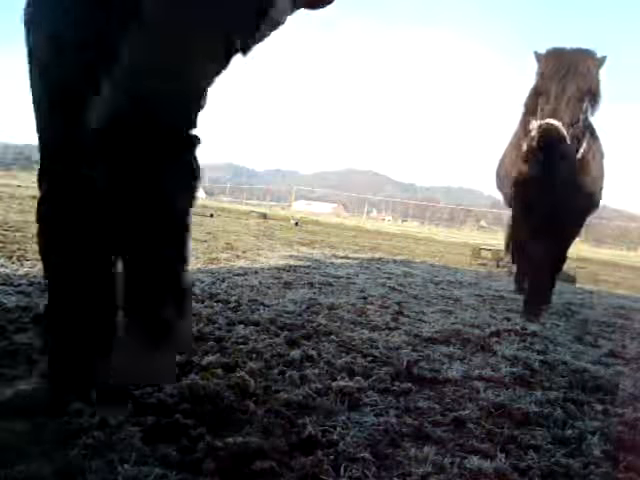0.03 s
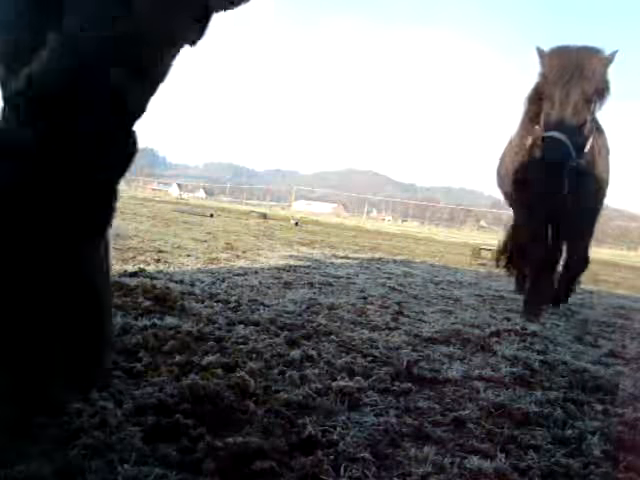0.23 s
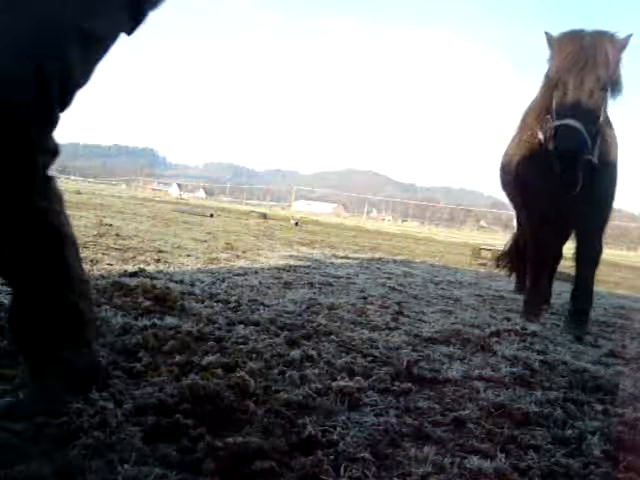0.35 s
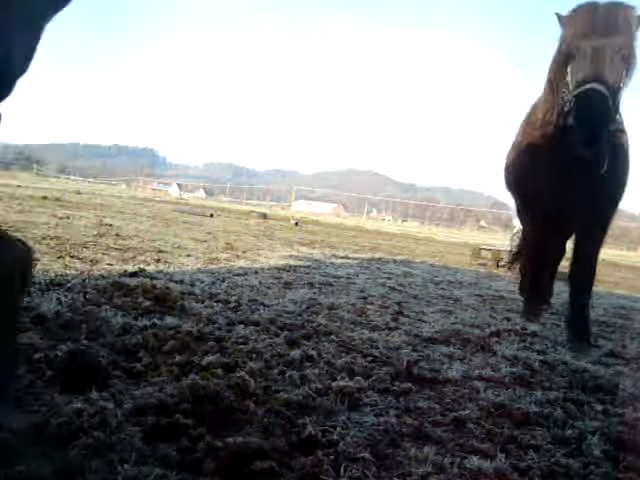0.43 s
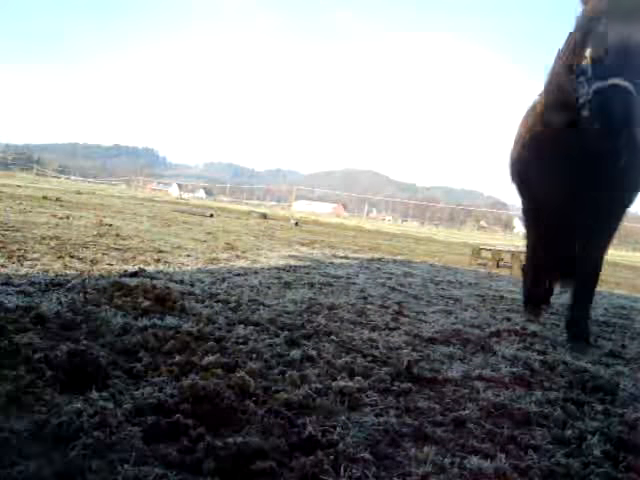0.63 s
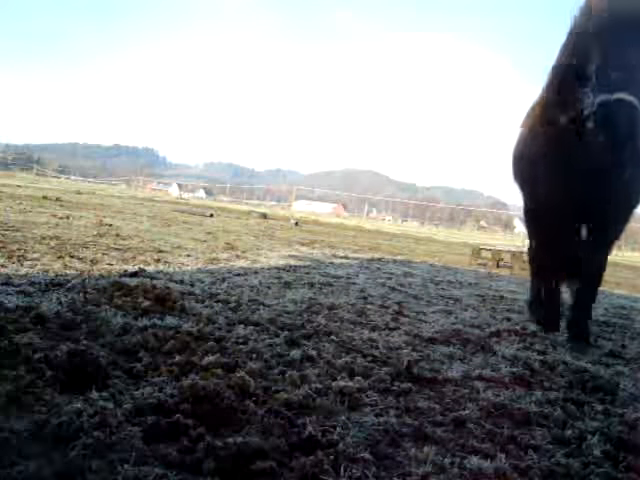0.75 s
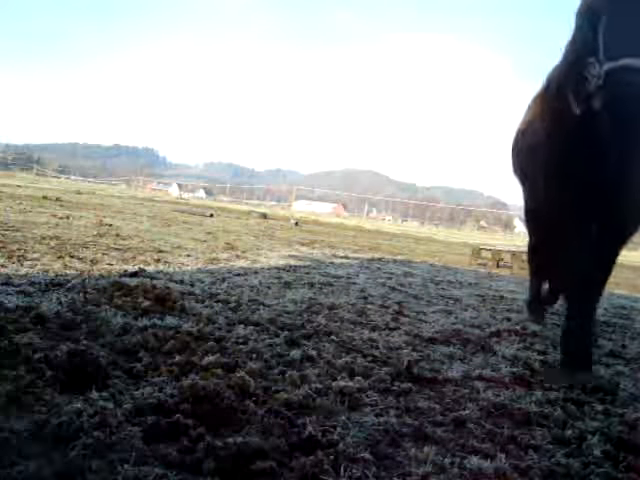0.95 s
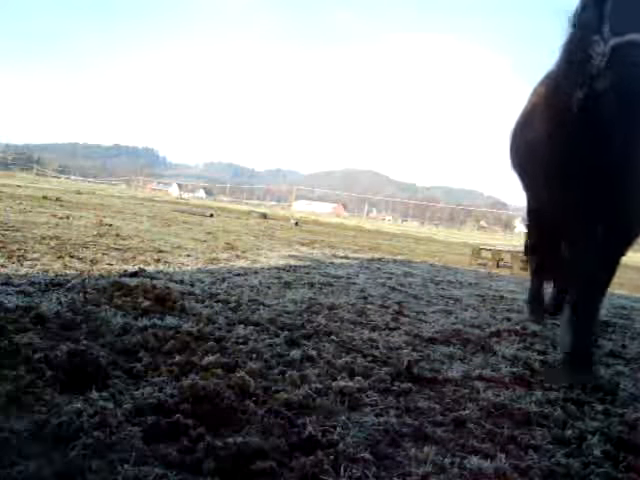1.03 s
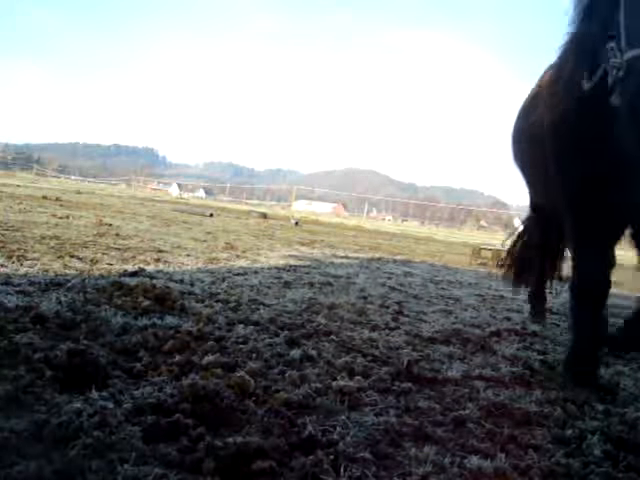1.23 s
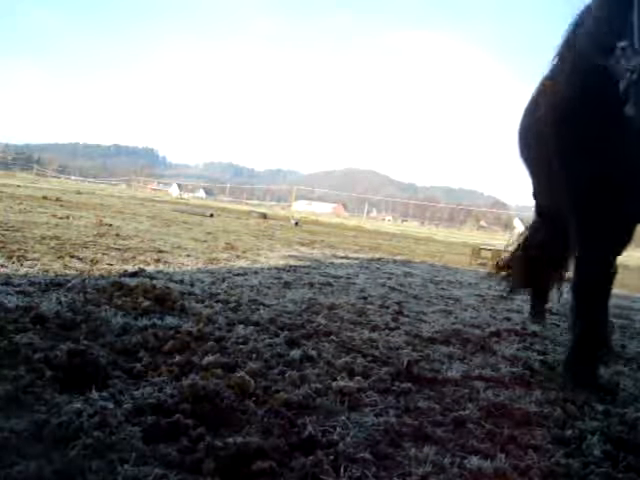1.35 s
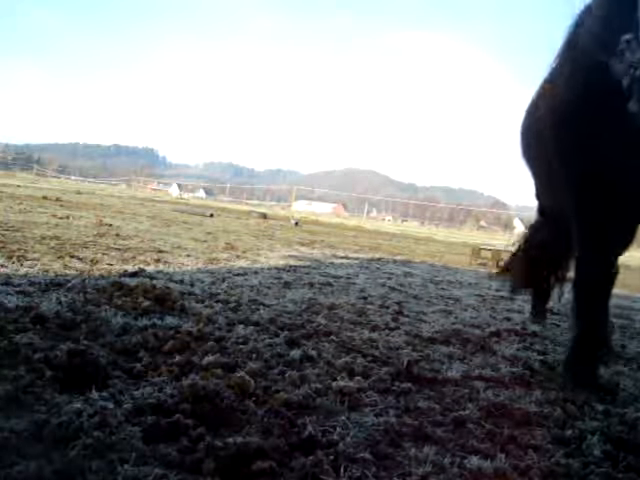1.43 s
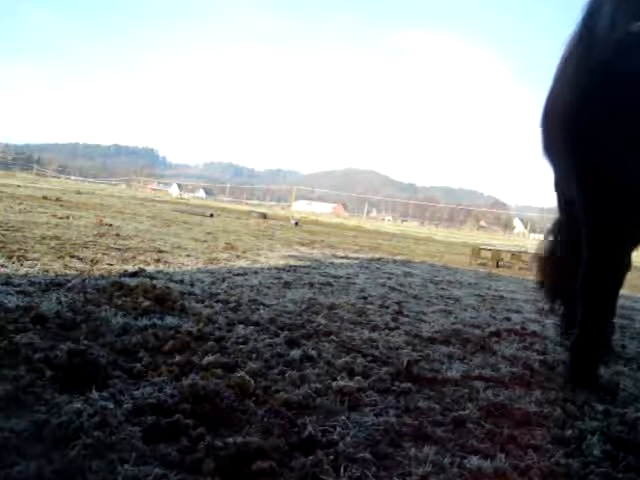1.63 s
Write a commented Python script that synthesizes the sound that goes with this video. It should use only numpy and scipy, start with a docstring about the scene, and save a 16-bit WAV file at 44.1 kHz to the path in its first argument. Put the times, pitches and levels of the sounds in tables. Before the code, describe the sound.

Crunching steps on frozen ground as a person and a pony walk through frosted grass.

```python
"""Footsteps on a frosty pasture

A person steps past a low microphone, with a pony walking up behind. Each footfall breaks the frozen
crust in a few dull knocks and crushes it into crumbs, and stiff stalks snap. Between footfalls, legs
and feet swish through the rimed grass. The air is open, without echo, and carries a faint steady rush."""
import sys
import numpy as np
from scipy import signal
from scipy.fft import rfft, irfft, next_fast_len
from scipy.io import wavfile
from scipy.ndimage import uniform_filter1d

SR = 44100
rng = np.random.default_rng(int(sys.argv[2]) if len(sys.argv) > 2 else 0)


def materialize(psi):
    """Save the field psi as 16-bit PCM at rate SR to the path in sys.argv[1].

    A 1-D psi becomes a single channel; in a 2-D psi each row is a channel.
    """
    bounded = np.clip(np.atleast_2d(psi).T, -1, 1)
    quanta = np.round(bounded * 32767).astype(np.int16)
    wavfile.write(sys.argv[1], SR, quanta)


N = 74970


def undb(db):
    """Amplitude grows tenfold with every 20 dB."""
    return 10 ** (np.asarray(db) / 20)


def unit(x):
    """Normalisation to an rms of 1."""
    return x / np.sqrt(np.mean(x ** 2) + 1e-18)


def since(start):
    """Seconds elapsed since a moment, for every sample."""
    return np.arange(N) / SR - start


def ring(start, t60):
    """Exponential decay: silence until the start, then a fall of 60 dB every t60 seconds."""
    t = since(start)
    return (t >= 0) * np.exp(-np.log(1000) * np.maximum(t, 0) / t60)


def colour(x, points, tilt_db=0):
    """Minimum-phase filtering through (Hz, dB) points, tilted in dB per octave about 1 kHz; rms 1."""
    size = 2 * next_fast_len(N // 2 + 2048)
    bin_hz = np.arange(size // 2 + 1) * SR / size
    octave = np.log2(np.maximum(bin_hz, 20) / 1000)
    hz, db = np.array(points).T
    gain_db = np.interp(octave, np.log2(hz / 1000), db) + tilt_db * octave
    cepstrum = irfft(np.log(undb(gain_db)))
    cepstrum[1:size // 2] *= 2  # folding the cepstrum makes the filter causal
    cepstrum[size // 2 + 1:] = 0
    return unit(irfft(rfft(x, size) * np.exp(rfft(cepstrum)))[:N])


def resonance(x, hz, width_hz):
    """A second-order resonator passes a band, with gain 1 at its centre."""
    return signal.lfilter(*signal.iirpeak(hz, hz / width_hz, fs=SR), x)


def fractures(per_s, spread_db):
    """A Poisson process of tiny impulses: many small ones, a few large."""
    size = undb(spread_db * np.minimum(rng.exponential(size=N), np.pi))
    return (rng.random(N) < per_s / SR) * size * rng.choice([-1, 1], N)


def flicker(per_s):
    """Random modulation: values drawn per_s times a second and smoothed twice; rms 1."""
    span = int(SR / per_s)
    held = rng.standard_normal(N)[np.arange(N) // span]
    return unit(uniform_filter1d(uniform_filter1d(held, span), span))


# Spectrum of the open field's rush. Each row: frequency in Hz, spectral density in dB.
AIR_SPECTRUM = [(25, -10), (50, -13), (76, 3), (100, -4.5), (150, 6), (210, 3.5), (400, 3.5), (800, 3.5),
                (1600, 0), (3500, -3.5), (7000, -8.5), (10000, -16.5)]

def air(level_db=-52.5):
    """Stationary broadband noise is heard as a faint, steady rush."""
    return undb(level_db) * colour(rng.standard_normal(N), AIR_SPECTRUM)


# Spectrum of brushed rime. Each row: frequency in Hz, level in dB.
RIME_SPECTRUM = [(100, -37.5), (400, -17), (1000, -10), (2000, -7.5), (3700, 1), (5200, -1.5), (7000, 0.5),
                 (8500, 0), (10000, -6)]
# Legs and feet brushing along. Each row: fastest moment in seconds, level in dB, rise and fall in
# seconds, tilt in dB per octave, lift of the high scrape in dB.
LEG_SWINGS = [(.2, -51, 0.13, 0.09, -1.5, -4.5), (0.307, -41, 0.022, 0.048, -1.5, 3),
              (.385, -40, 0.059, 0.053, -5.5, 1), (.50, -42.5, 0.056, 0.078, -5, -1),
              (0.573, -37, 0.044, 0.027, -1.2, -0.5), (.608, -42, 0.01, 0.0067, .9, 6),
              (.74, -55.5, 0.073, 0.11, -5, 2), (0.783, -46.5, 0.0061, 0.011, 0.5, 3),
              (0.929, -53, 0.089, 0.0091, -1, -5), (1.03, -43.5, 0.075, 0.048, -4.4, -2.5),
              (1.084, -44.5, 0.046, 0.051, -3.5, 9), (1.149, -44.5, 0.071, 0.11, -2, -1),
              (1.278, -44.5, 0.032, 0.055, -3.4, -1.5), (1.44, -47.5, 0.14, 0.16, -1.1, -5.5),
              (1.513, -38.5, 0.021, 0.01, 0, -4), (1.63, -55.5, 0.083, 0.069, 1.5, 0.5)]

def swishes():
    """Friction on cloth and frosted blades makes a fine crackle that follows the speed of the leg."""
    out = np.zeros(N)
    scrape_flicker_db = 2 * flicker(per_s=70.35)
    for fastest, db, rise, fall, tilt_db, scrape_db in LEG_SWINGS:
        t = since(fastest)
        speed = np.exp(-(t / np.where(t < 0, rise, fall)) ** 2)
        rime = colour(fractures(per_s=14000, spread_db=4.5), RIME_SPECTRUM, tilt_db)
        high_band = resonance(rime, hz=7040, width_hz=2350)
        scrape = (undb(scrape_db + scrape_flicker_db) - 1) * high_band
        out += undb(db) * speed * unit(rime + scrape)
    level_flicker_db = 1.5 * flicker(per_s=110)
    return out * undb(level_flicker_db)


# Spectrum of crumbling crust. Each row: frequency in Hz, level in dB.
CRUST_SPECTRUM = [(60, -36), (140, -24), (250, -5.5), (450, -0.5), (750, 0.5), (1200, -1), (1700, -7.5),
                  (2600, -7.5), (4500, -13), (10000, -18)]
# Weight bearing on the crust. Each row: start in seconds, level in dB, hold and release in seconds,
# tilt in dB per octave.
FOOT_LOADS = [(0.065, -57, 0.13, .06, -1), (0.248, -36, 0.054, 0.04, -2), (0.347, -37.5, 0.037, 0.088, 0.7),
              (0.504, -41.5, 0.041, 0.051, 1.7), (.76, -49, 0.011, 0.048, -0.3),
              (0.846, -44, 0.042, 0.037, -1.5), (0.905, -40.5, .03, 0.035, -0.8),
              (0.978, -44, 0.052, .17, -2), (1.265, -40, 0.034, 0.038, -1.2),
              (1.348, -47, 0.087, 0.098, 0.3), (1.504, -40, 0.017, .022, 1),
              (1.542, -52, 0.045, 0.11, -1.1)]

def crunches(attack_s=0.0051):
    """Brittle crushing: crumbs break as the weight comes on, and fade as the foot settles."""
    out = np.zeros(N)
    crumbs = fractures(per_s=3200, spread_db=4)
    for start, db, hold, release, tilt_db in FOOT_LOADS:
        t = since(start)
        loading = np.clip(t / attack_s, 0, 1)
        settling = np.exp(-(np.maximum(t - hold, 0) / release) ** 2)
        crunch = colour(np.roll(crumbs, rng.integers(N)), CRUST_SPECTRUM, tilt_db)
        out += undb(db) * loading * settling * crunch
    return out


# Spectrum of the crack on each knock. Each row: frequency in Hz, level in dB.
CRACK_SPECTRUM = [(100, -44.5), (300, -10.5), (900, -12), (2500, -2), (4500, -8.5), (10000, -12)]
# Frozen crust giving way. Each row: start in seconds, peak of the thump in dB, pitch in Hz,
# 60 dB decay time in seconds, level of the crack in dB relative to the thump.
CRUST_BREAKS = [(0.2486, -18.5, 940, 0.0092, -13), (0.2516, -16, 507, 0.025, -18),
                (.2545, -26.5, 686, 0.035, -11), (0.2633, -26, 282, 0.038, -22),
                (.2760, -18.5, 640, 0.0075, -9.5), (0.2795, -26, 437, 0.02, -12),
                (.2865, -20, 464, 0.021, -15), (0.2925, -21, 430, .02, -22), (.3000, -17, 566, 0.014, -19),
                (0.3559, -35, 303, 0.077, -20), (0.3639, -26, 346, 0.016, -13),
                (.3726, -34, 780, 0.0031, 2), (0.3883, -22.5, 1156, 0.01, -11.5),
                (.4175, -35.5, 890, 0.015, -6), (0.452, -32.5, 927, 0.015, -2),
                (.8535, -36.5, 740, 0.02, -2.5), (0.88, -34, 239, 0.072, -6), (.9110, -43, 397, 0.013, -2),
                (0.9367, -34, 630, .016, -10), (1.1290, -30.5, 804, 0.014, -15),
                (1.1700, -35, 800, 0.0092, -7), (1.2315, -35, 721, 0.0054, -2),
                (1.2590, -24.5, 508, 0.008, -16), (1.3152, -32, 920, 0.0035, -8),
                (1.5076, -27.5, 817, 0.01, -22), (1.6701, -41, 710, 0.01, -2)]

def knocks(push_s=0.0011, upper_ratio=2.05, upper_db=-11.5):
    """Impact excitation: each break rings two damped modes of the hard turf, with a short crack on top."""
    out = np.zeros(N)
    crack_noise = colour(rng.standard_normal(N), CRACK_SPECTRUM)
    for start, db, hz, t60, crack_db in CRUST_BREAKS:
        t = np.maximum(since(start), 0)
        push = 1 - np.exp(-t / push_s)
        phase = 2 * np.pi * hz * t
        modes = np.sin(phase) + undb(upper_db) * np.sin(upper_ratio * phase)
        thump = push * ring(start, t60) * modes
        crack = undb(crack_db) * crack_noise * ring(start, t60=0.019)
        out += undb(db) * (crack - thump / np.abs(thump).max())
    return out


# Frozen stalks snapping. Each row: start in seconds, level in dB, centre frequency in Hz.
STALK_BREAKS = [(0.3056, -26, 5250), (0.457, -37.5, 2600), (.7635, -40, 1580), (.772, -43, 2400),
                (0.9352, -39.5, 5400), (1.1426, -36.5, 3100), (1.559, -41, 2000), (1.5680, -31, 2280),
                (1.6682, -41, 5870)]

def snaps():
    """Brittle fracture of a stiff stalk gives a bright tick: a broad band of fast-decaying noise."""
    out = np.zeros(N)
    for start, db, hz in STALK_BREAKS:
        band = resonance(rng.standard_normal(N), hz, width_hz=hz)
        stalk = resonance(band, hz, width_hz=hz)  # a second pass steepens the skirts
        out += undb(db) * unit(stalk) * ring(start, t60=0.014)
    return out


def scene():
    """Superposition of all sources in mono; the footsteps carry no low boom below about 170 Hz."""
    step_bass_cut = signal.butter(3, 167, "high", fs=SR, output="sos")
    steps = signal.sosfilt(step_bass_cut, knocks() + crunches())
    return (air() + swishes() + steps + snaps())[None]


def record(dry):
    """Band limiting: a small microphone thins the bass and cuts the top steeply."""
    bass_cut = signal.butter(2, 55, "high", fs=SR, output="sos")
    top_cut = signal.ellip(12, .2, 70, 10080, fs=SR, output="sos")
    return signal.sosfilt(top_cut, signal.sosfilt(bass_cut, dry))


dry = scene()
out = record(dry)
materialize(out)
```